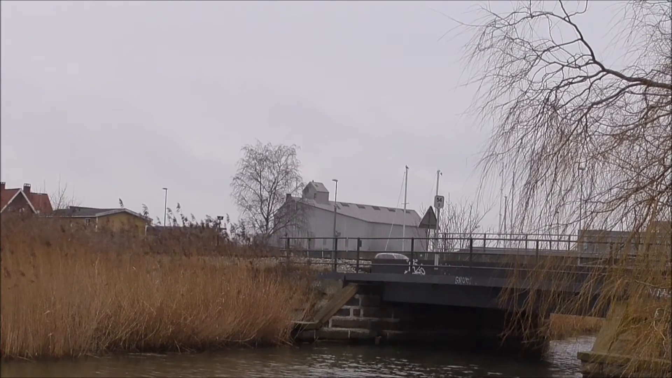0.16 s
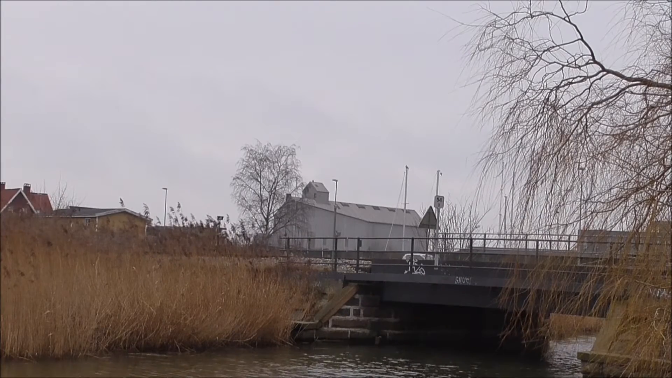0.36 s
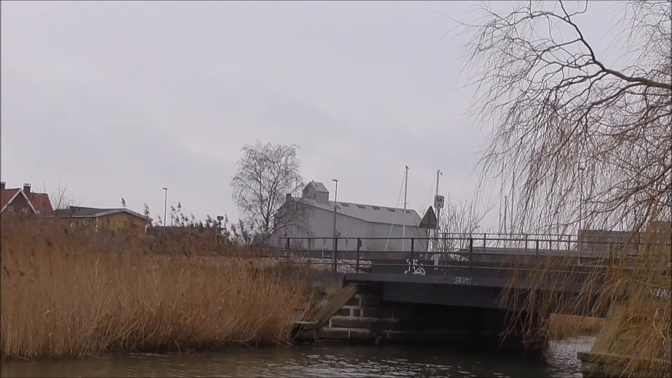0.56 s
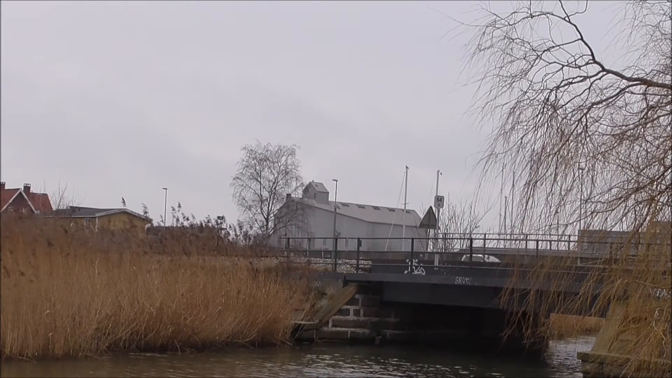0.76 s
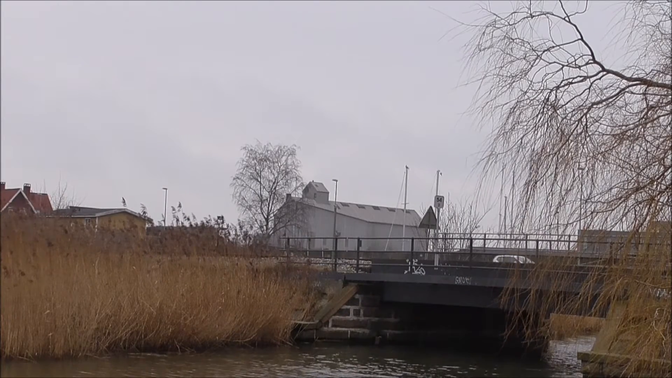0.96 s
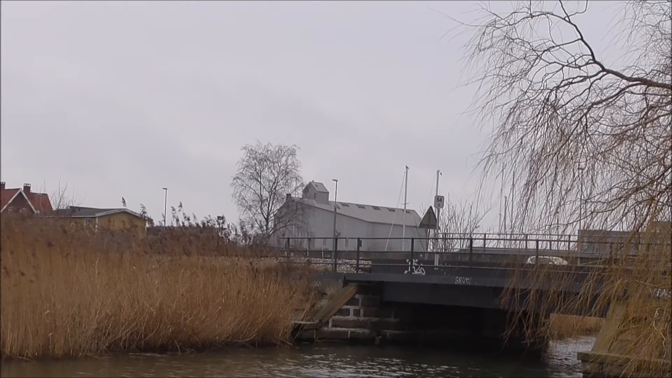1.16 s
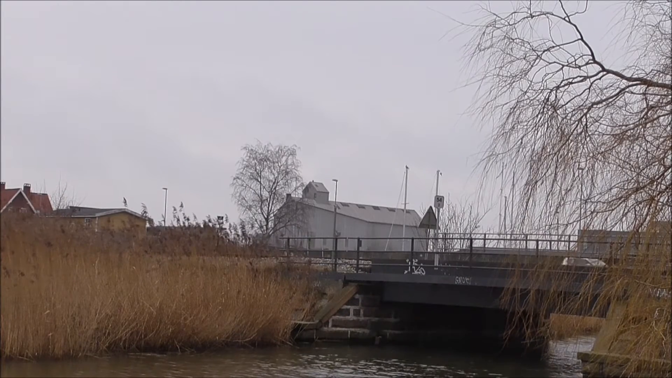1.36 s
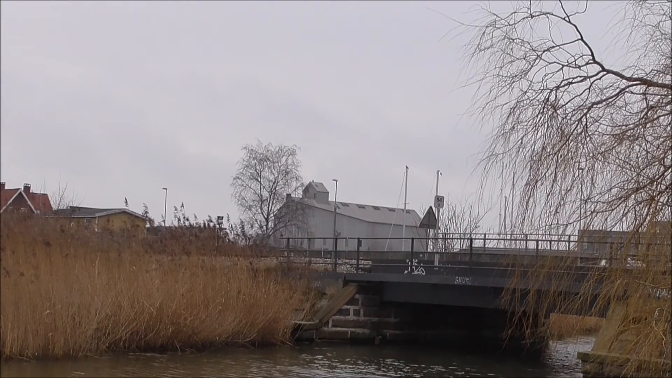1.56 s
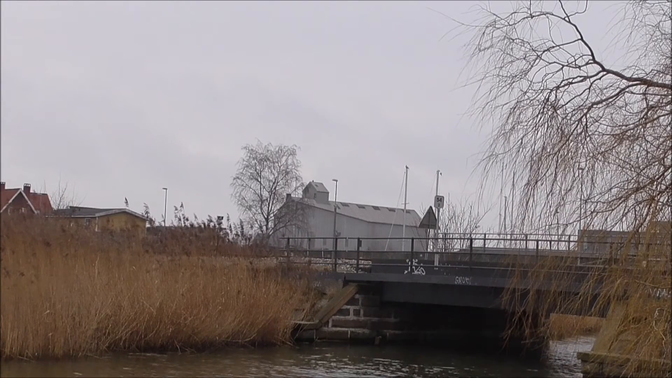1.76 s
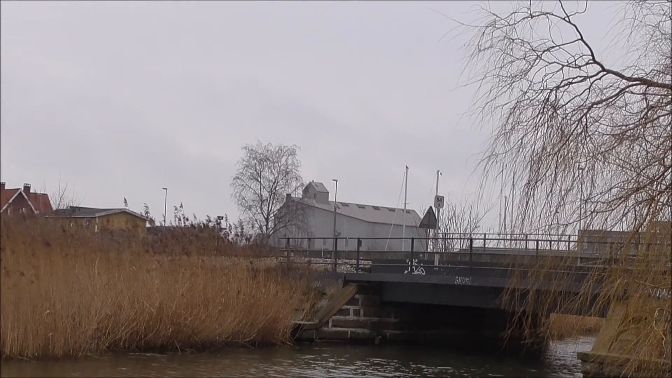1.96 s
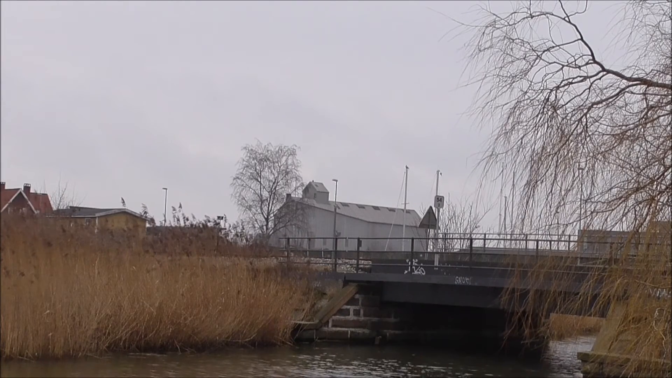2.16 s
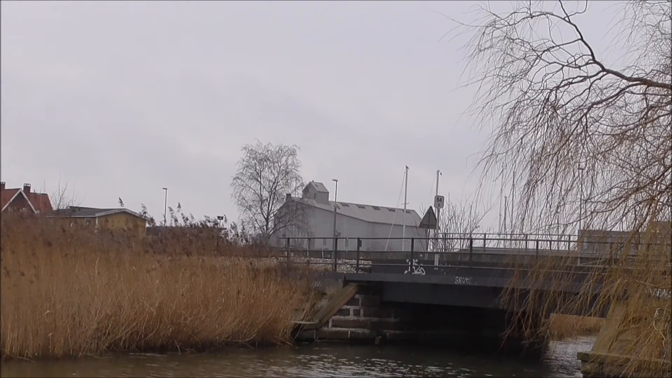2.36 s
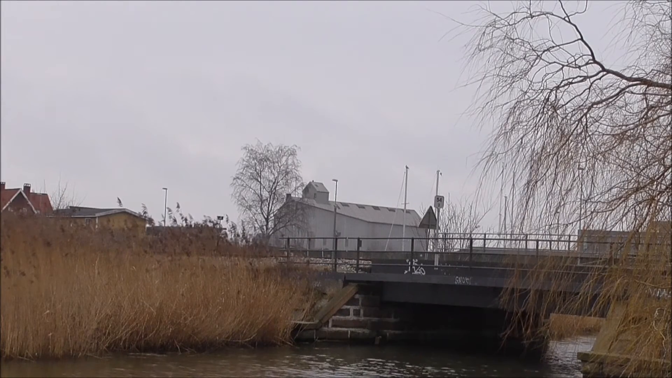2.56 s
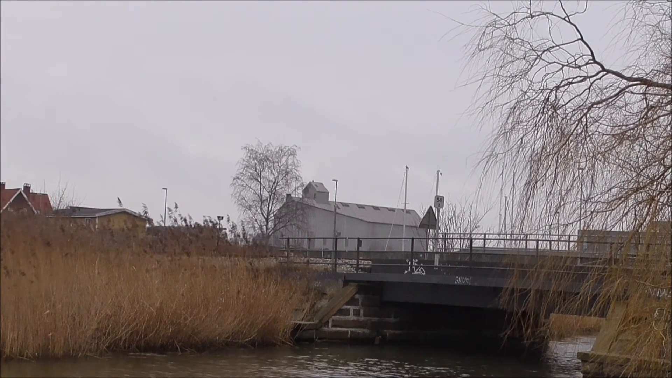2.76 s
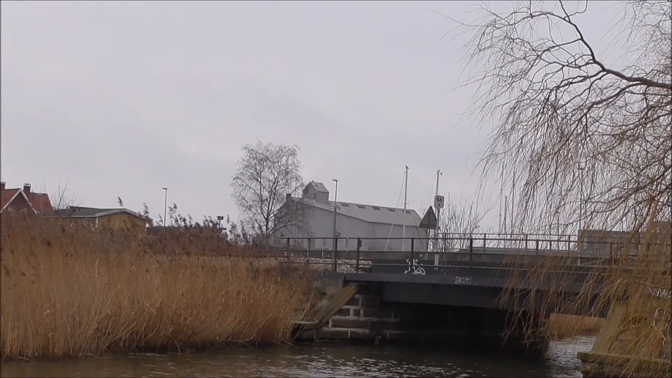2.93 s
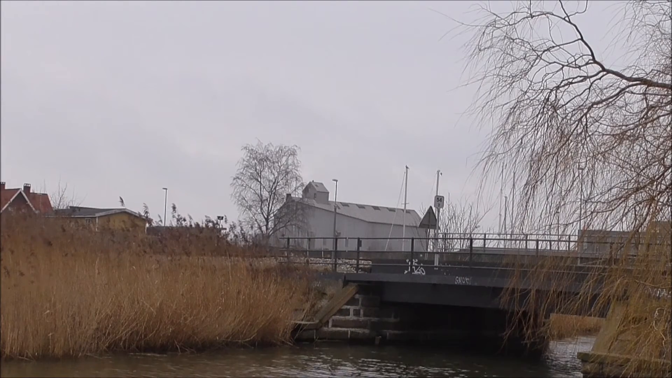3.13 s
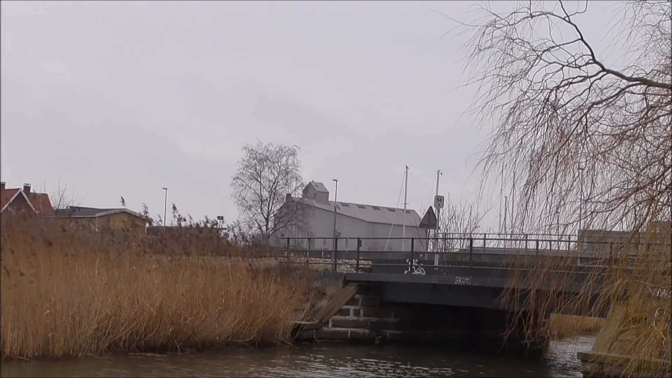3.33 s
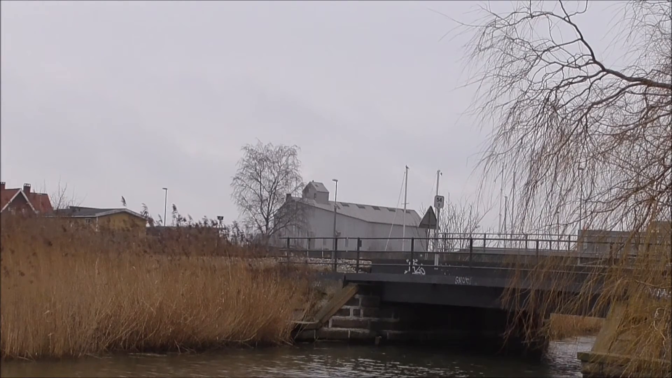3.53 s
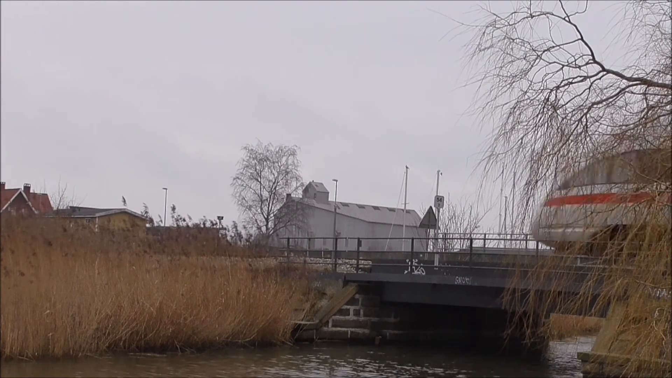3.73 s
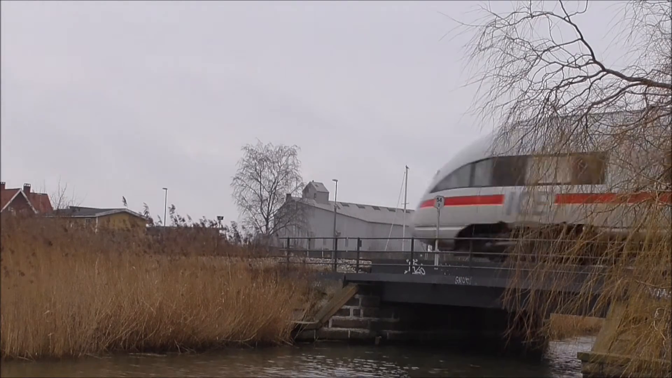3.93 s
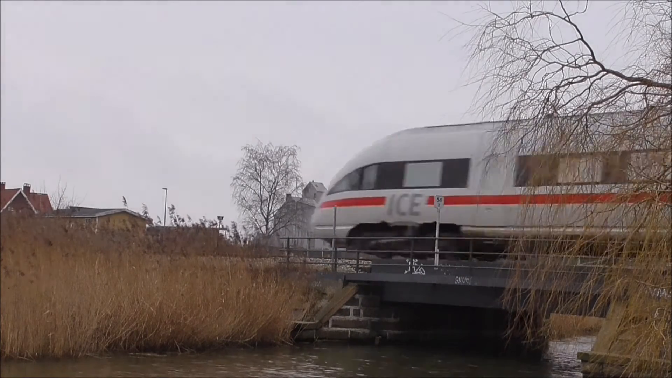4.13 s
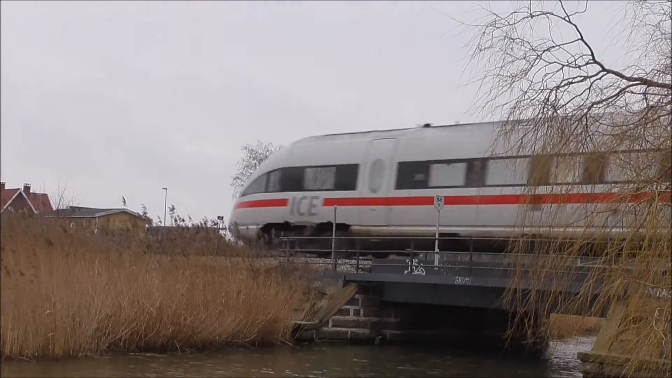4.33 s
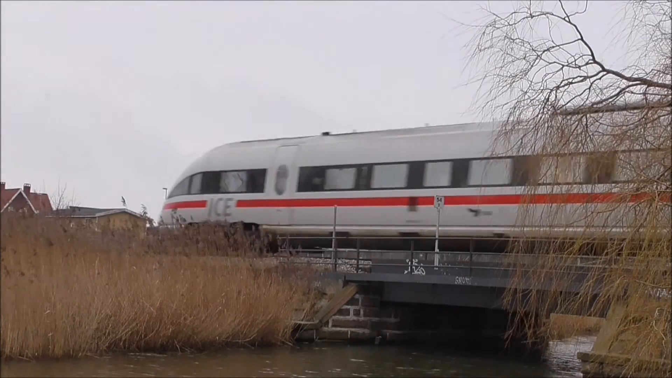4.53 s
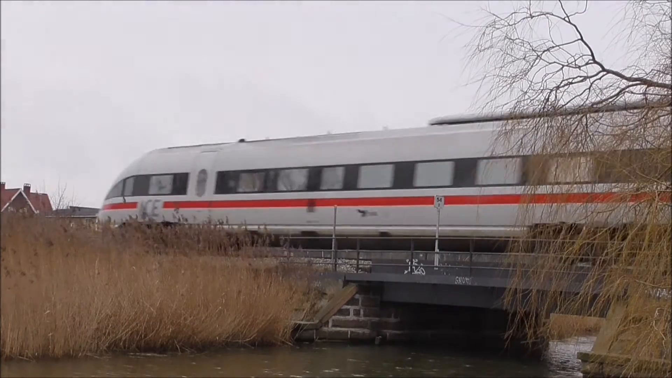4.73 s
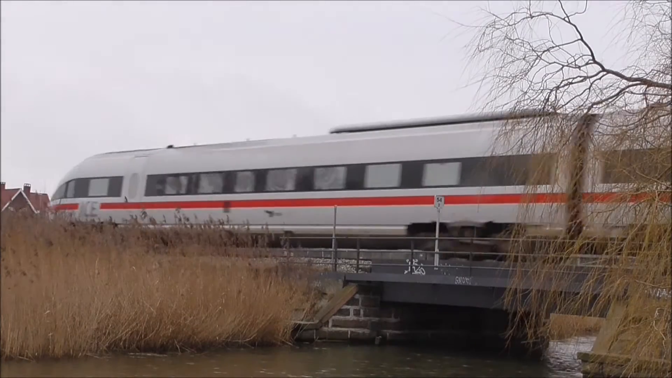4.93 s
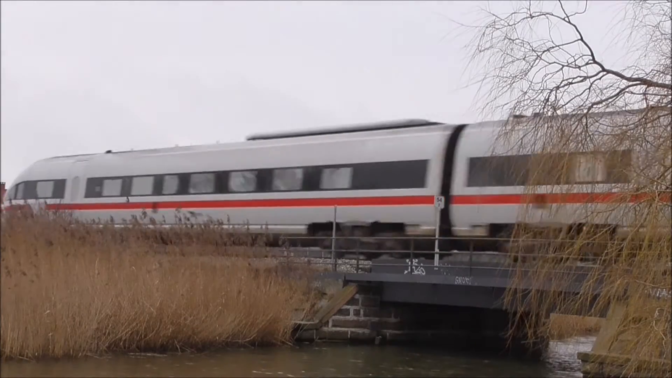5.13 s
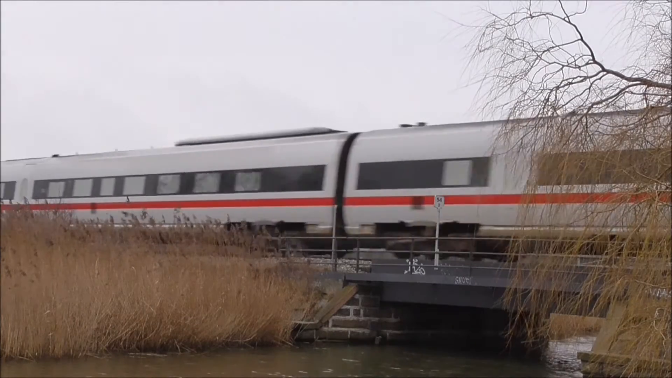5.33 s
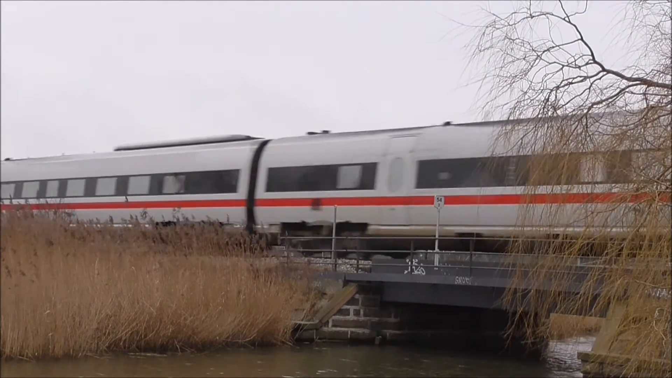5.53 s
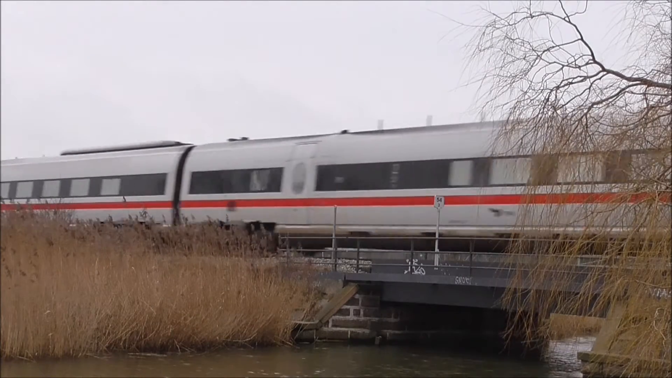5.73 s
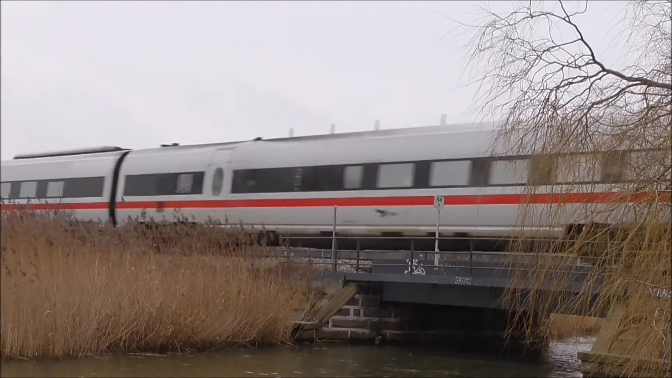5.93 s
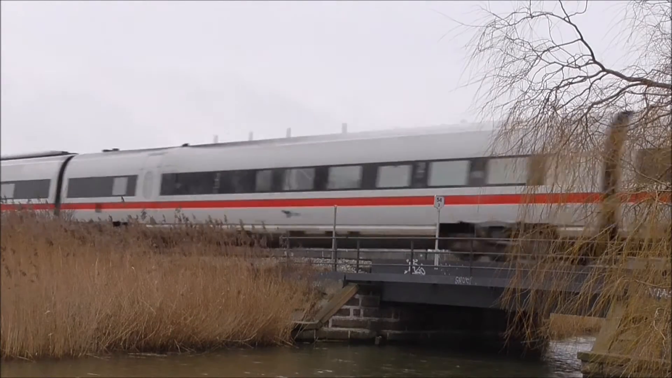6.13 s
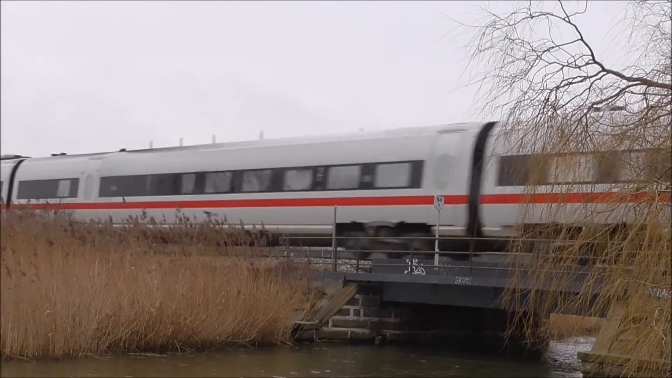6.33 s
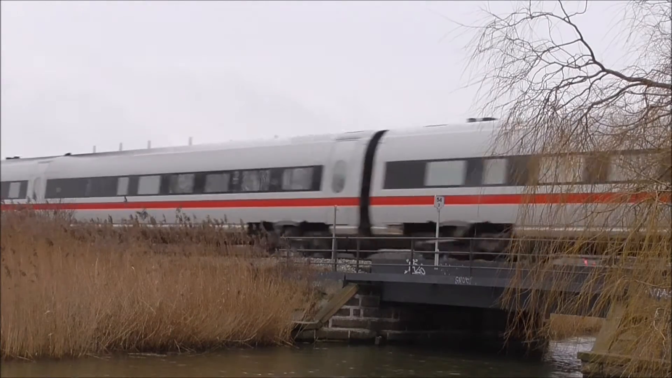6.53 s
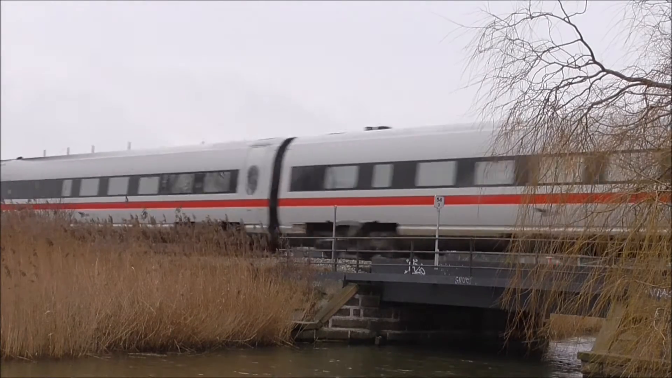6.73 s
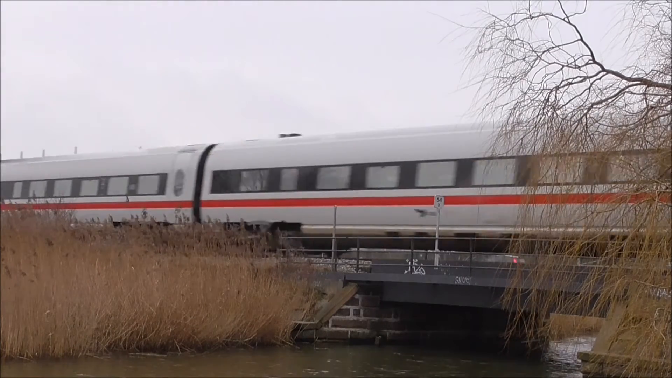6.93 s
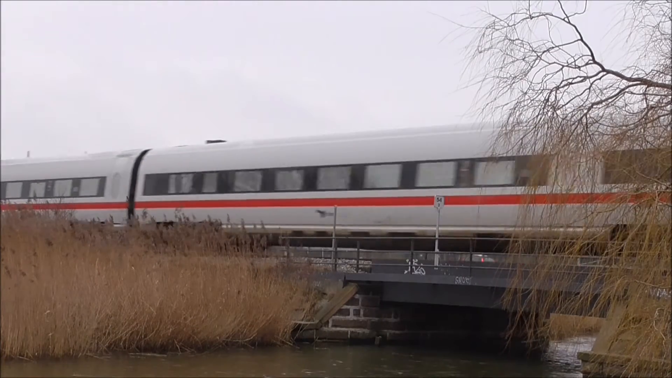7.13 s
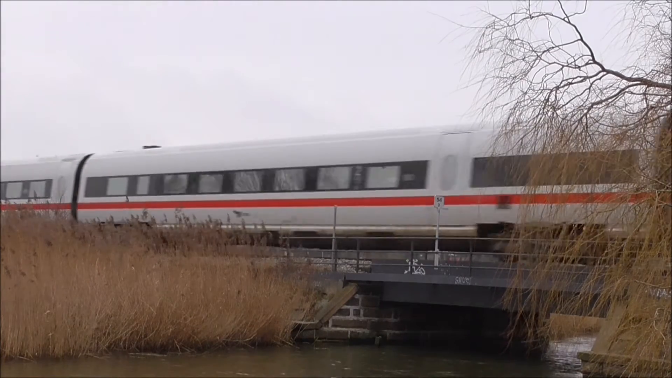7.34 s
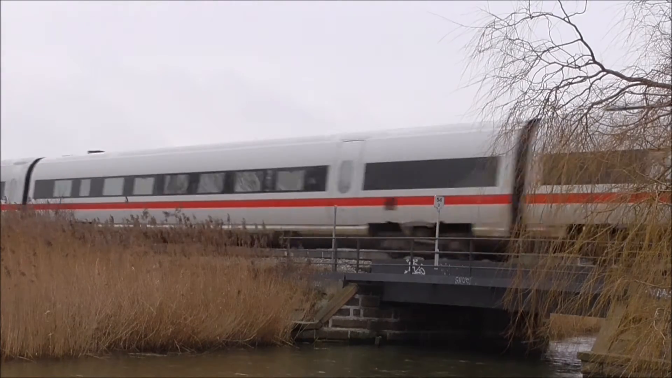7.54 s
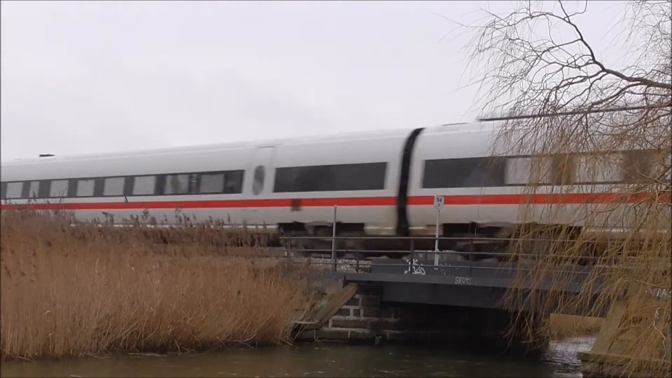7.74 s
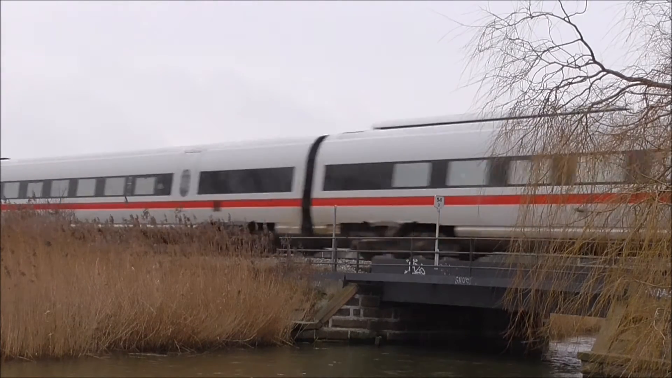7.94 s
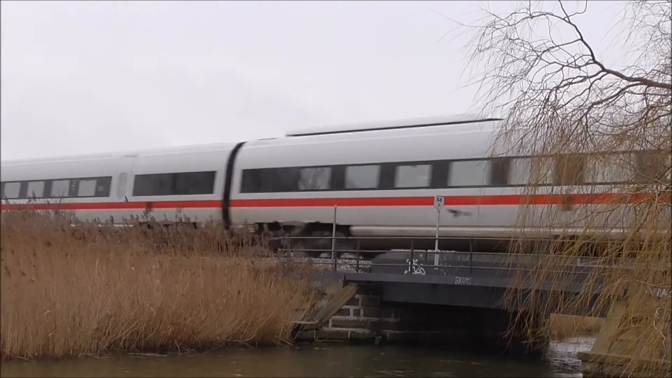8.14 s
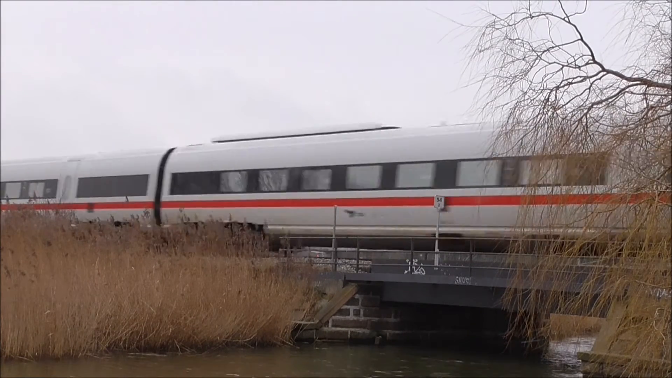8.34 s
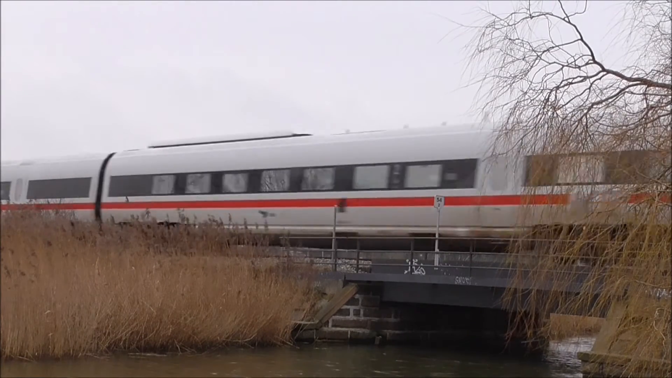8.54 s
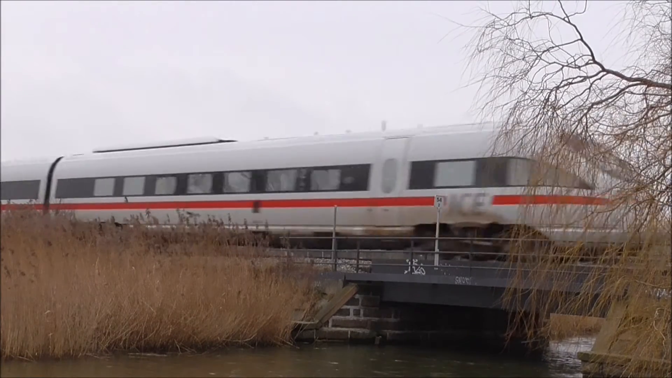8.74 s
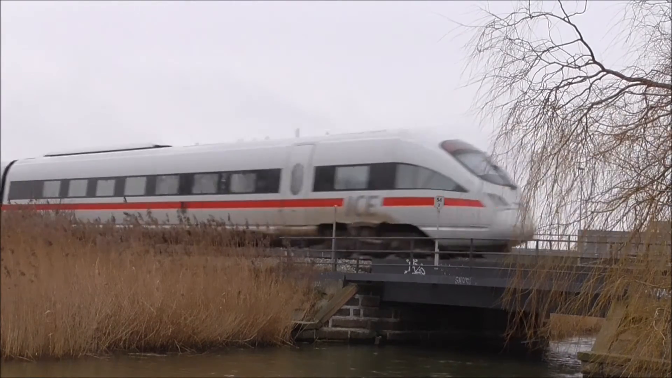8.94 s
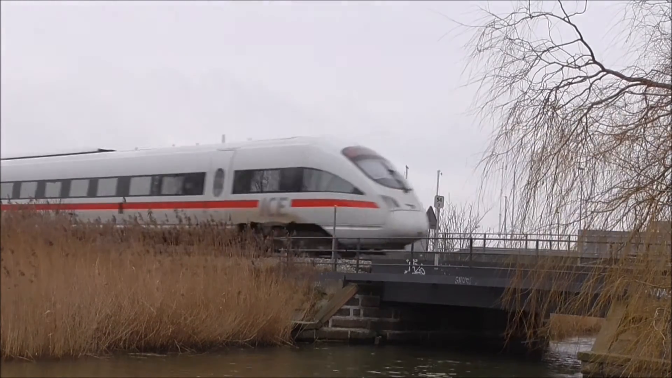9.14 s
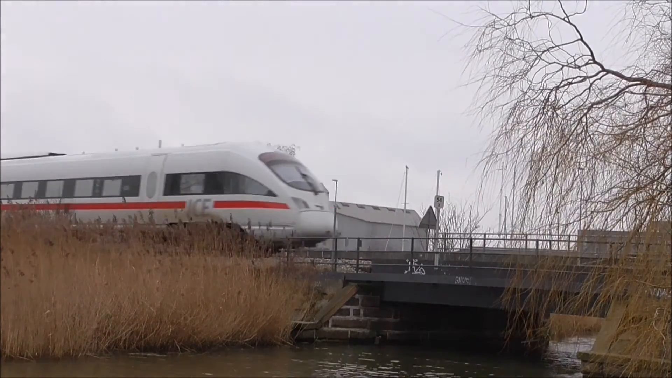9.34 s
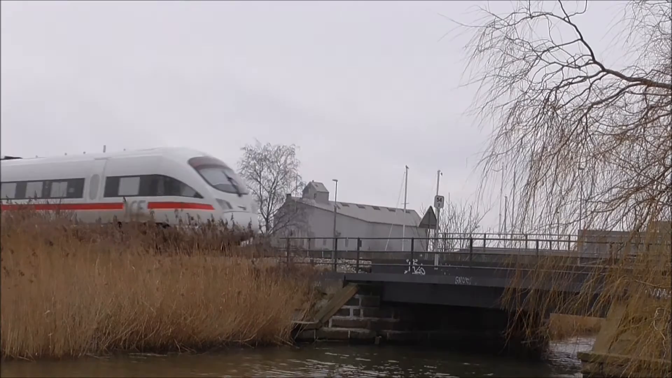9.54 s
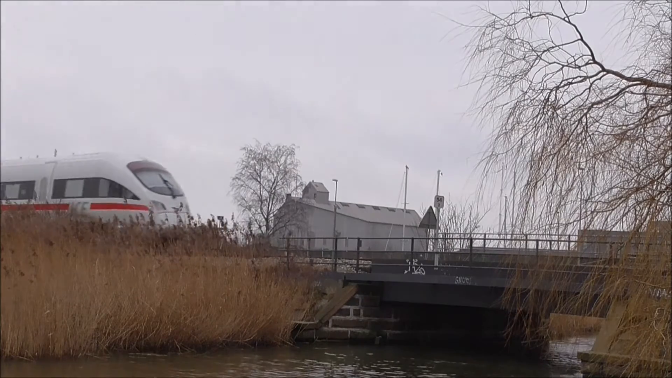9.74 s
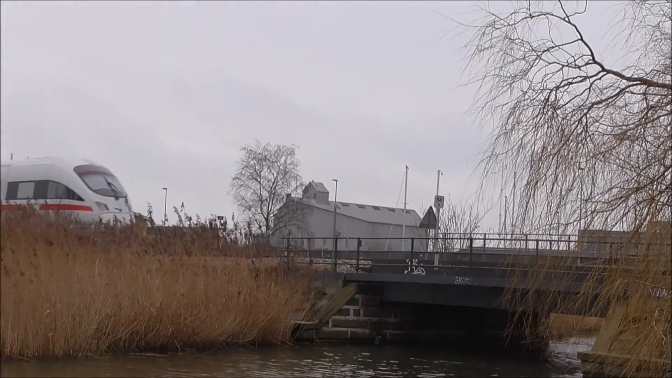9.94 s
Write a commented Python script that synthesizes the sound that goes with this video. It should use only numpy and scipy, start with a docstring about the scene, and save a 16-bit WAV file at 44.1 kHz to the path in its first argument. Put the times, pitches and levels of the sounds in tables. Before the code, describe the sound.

A fixed outdoor stereo microphone close to a steel railway bridge hears far tyre wash, then a growing roar and bright sizzle in the rails. The train crosses for about five seconds: deep deck boom surging coach by coach, nasal mid-pitched whine with short bursts, metallic wheel ring, airy rush and low clunks. The sound narrows and fades, leaving wheel singing and tiny dry ticks.

```python
"""Train crossing a steel bridge

A fast passenger train comes up and crosses a low steel bridge, heard from the river bank.
Shaped noise makes the hiss of the rails ahead of it, the boom of the deck and the ring of the wheels.
Gliding tones make the whine of a few wavy wheelsets, throbbing once a turn and sinking in pitch.
Decaying tones make the knocks; road noise, faint hiss, a hum and small ticks fill in the rest."""
import sys
import numpy as np
from scipy import signal
from scipy.fft import rfft, irfft
from scipy.io import wavfile
from scipy.ndimage import map_coordinates

SR = 44100
rng = np.random.default_rng(int(sys.argv[2]) if len(sys.argv) > 2 else 0)


def bounce(signal):
    """Save signal as a 16-bit WAV file at the path given by the first command-line argument."""
    frames = np.transpose(np.atleast_2d(signal))
    limited = np.clip(frames, -1, 1)
    pcm = np.round(limited * 32767).astype(np.int16)
    wavfile.write(sys.argv[1], SR, pcm)


N = 440559
TIME = np.arange(N) / SR   # seconds
FREQS = np.maximum(np.arange(N // 2 + 1) * SR / N, 1)   # Hz
LEFT_RIGHT = np.array([[1], [-1]])   # opposite signs for the two sides
# the head of the train draws level, and its tail starts to draw away (s)
HEAD_S, TAIL_S = 3.55, 8.6


def from_db(db):
    """Decibels to gain."""
    return 10 ** (np.asarray(db) / 20)


def rms_one(x):
    """Scale to unit power."""
    return x / np.sqrt(np.mean(np.abs(x) ** 2) + 1e-20)


def at_hz(points):
    """Read a table of pitches and values on a log-frequency axis."""
    hz, value = np.transpose(points)
    return np.interp(np.log(FREQS), np.log(hz), value)


def colour(spectrum, modes=()):
    """Gain of a spectrum with steep ends, lifted (or dipped) around its resonances."""
    db = at_hz(spectrum)
    for hz, width_hz, lift_db in modes:
        db = db + lift_db / (1 + (2 * (FREQS - hz) / width_hz) ** 2)
    low_end = np.minimum(FREQS / spectrum[0][0], 1)
    high_end = np.minimum(spectrum[-1][0] / FREQS, 1)
    return from_db(db) * (low_end * high_end) ** 6


def wander(width_hz, size=8192):
    """Slow complex random drift of unit power and given bandwidth, drawn on a coarse time grid."""
    hz = np.arange(size // 2 + 1) * SR / N
    smoothing = 1 + (2 * hz / width_hz) ** 4
    real, imag = irfft(rfft(rng.standard_normal((2, size))) / smoothing)
    return np.interp(np.arange(N) * size / N, np.arange(size), rms_one(real + 1j * imag))


# how alike the two microphones hear each pitch: pitch_hz, left_right_correlation (-1 to 1)
LIKENESS = [(30, .96), (90, .995), (500, .99), (800, .95), (1130, .68), (1500, .85), (2150, .96),
            (3200, .87), (4000, -.15), (4900, -.75), (5900, -.7), (7200, .15), (10000, .5), (15000, .5)]


def noise(spectrum, modes=()):
    """Stereo noise whose middle has unit power; its side follows the likeness of the microphones."""
    mid, side = rfft(rng.standard_normal((2, N))) * colour(spectrum, modes)
    alike = np.clip(at_hz(LIKENESS), -.95, .998)
    mid, side = irfft([mid, side * np.sqrt((1 - alike) / (1 + alike))], N)
    return (mid + side * LEFT_RIGHT) / np.std(mid)


def band(hz, width_hz, side_db):
    """A narrow band of noise on a gliding pitch, with a weaker part scattered by the banks."""
    carrier = np.exp(2j * np.pi * np.cumsum(hz) / SR)
    mid, side = (rms_one((carrier * wander(width_hz)).real) for _ in range(2))
    return mid + from_db(side_db) * side * LEFT_RIGHT


def flutter(depth_db, rate_hz):
    """Uneven gain from changing roughness under the wheels."""
    return from_db(depth_db * wander(rate_hz).real)


def swell(start, end, rise_db_per_s, fall_db_per_s):
    """Gain that climbs towards one at start, holds until end and dies away."""
    before = np.maximum(start - TIME, 0)
    after = np.maximum(TIME - end, 0)
    return from_db(-rise_db_per_s * before - fall_db_per_s * after)


def bump(s, half_length):
    """A smooth hump of height one."""
    return np.exp(-((TIME - s) / half_length) ** 2)


# every pitch falls by about this share on either side of its closest point, over about this long (s)
DOPPLER_SWING, DOPPLER_S = .119, 1.954


def doppler(closest):
    """Pitch ratio of something on the train: high while it nears, low once it has gone by."""
    since = TIME - closest
    return 1 / (1 + DOPPLER_SWING * since / np.hypot(since, DOPPLER_S))


# the noise surges once for each coach: middle_s, half_length_s, rail_lift_db, wheel_lift_db, hiss_lift_db
COACHES = [(3.782, 0.23, 3, 2.5, 3.5), (4.901, 0.21, 2, 3, 3.5), (6.094, 0.75, 5, 5, 3.5),
           (7.337, 0.18, 3, 2.5, 0), (8.101, .45, 1.5, 2.5, 0)]


def surges():
    """Gains of rails, wheels and hiss as one coach after another goes by."""
    return from_db(sum(np.outer(lifts_db, bump(s, half_length)) for s, half_length, *lifts_db in COACHES))


SLEEPERS_PER_S = 31.5


def sleepers(depth):
    """Gain that ripples as the wheels pass over the sleepers."""
    return 1 + depth * np.cos(2 * np.pi * SLEEPERS_PER_S * TIME)


# the microphones' own hiss: pitch_hz, relative_level_db (per Hz)
MIC_HISS = [(5000, -5.5), (10000, 4), (13000, 1), (16000, -2.5)]


def mic_hiss(level_db=-77.0):
    """The microphones add a faint, even hiss of high noise."""
    return from_db(level_db) * noise(MIC_HISS)


# rumble of distant traffic: pitch_hz, relative_level_db (per Hz)
TRAFFIC = [(30, -28), (48, -15.5), (68, -3), (100, 2.5), (135, -3), (300, -20)]
# tyres on a road behind the bridge: pitch_hz, relative_level_db (per Hz)
TYRES = [(600, -5), (900, 4), (1400, -5), (2100, -9.5), (3000, -22.5), (5000, -36)]


def traffic(level_db=-55, tyres_db=-49):
    """Far roads make a low steady rumble under everything, with a wash of tyres."""
    return from_db(level_db) * noise(TRAFFIC) + from_db(tyres_db) * noise(TYRES)


# thin sizzle of the rails: pitch_hz, relative_level_db (per Hz)
RAIL_SIZZLE = [(2500, -26.5), (3600, -12), (4500, -10.5), (5900, -22.5), (7000, -20.5), (7900, -8),
               (9200, -4), (11000, -3), (11900, -7), (13300, -15), (15500, -17.5)]
# the flare of the sizzle, brighter than the rest of it: pitch_hz, relative_level_db (per Hz)
SIZZLE_FLARE = [(2650, -21), (3600, -9), (4600, -9), (5950, -22), (6400, -18), (6910, -17), (7670, -11),
                (11100, 2), (11700, -0.5), (15500, -15)]
# the flare spurts before it breaks off: middle_s, half_length_s, lift_db
SPURTS = [(2.32, .03, 2), (2.591, .01, 2.5), (2.647, .013, 2), (2.738, .018, 4.5)]


def sizzle(level_db=-62.0, loudest_s=2.1, flare_from=2.33, flare_until=2.755, flare_db=-45.0,
           flare_growth_db_per_s=15):
    """Rails carry a thin sizzle far ahead of the wheels; a brighter flare spurts, then breaks off."""
    bed = from_db(level_db) * swell(loudest_s, loudest_s, rise_db_per_s=9.5, fall_db_per_s=2) * surges()[2]
    growth_db = flare_db + flare_growth_db_per_s * np.minimum(TIME - flare_until, 0)
    spurt_db = sum(db * bump(s, half_length) for s, half_length, db in SPURTS)
    flare = from_db(growth_db + spurt_db) * swell(flare_from, flare_until, rise_db_per_s=60, fall_db_per_s=225)
    flare = flare * flutter(depth_db=1.3, rate_hz=160)
    return bed * noise(RAIL_SIZZLE) + flare * noise(SIZZLE_FLARE)


def rail_ring(start=2.14, end=3.1, level_db=-55, pitch_hz=2620, sag_hz_per_s=190, width_hz=750):
    """The rails ring in a broad high band, sinking in pitch, just ahead of the first wheels."""
    level = from_db(level_db) * swell(start, end, rise_db_per_s=110, fall_db_per_s=6.5)
    return level * band(pitch_hz - sag_hz_per_s * (TIME - start), width_hz, side_db=-8.0)


# rush of air: pitch_hz, relative_level_db (per Hz)
AIR = [(3500, -19.5), (5000, -6.5), (5700, -0.5), (6500, -6), (7400, 1), (9000, 0), (9800, 0.5),
       (10800, -11), (12500, -24)]


def rush(level_db=-64.5):
    """Air rushes along the coaches while they are near."""
    level = from_db(level_db) * swell(HEAD_S, TAIL_S, rise_db_per_s=6.5, fall_db_per_s=9) * surges()[2]
    return level * sleepers(depth=.12) * noise(AIR) * flutter(depth_db=0.7, rate_hz=110)


# small dry ticks: start_s, relative_level_db
TICKS = [(7.3864, -45), (9.6081, -44), (9.6218, -50), (9.6324, -52), (9.685, -42), (9.737, -40),
         (9.7475, -51)]
# colour of a tick: pitch_hz, relative_level_db (per Hz)
TICK = [(4000, -29), (7000, -11), (9000, 0), (11500, -1), (16000, -21)]


def ticks(decay=0.0054, gain_db=-13.0):
    """Bright snaps of noise die away with a time constant of a few milliseconds."""
    hits = np.zeros(N)
    for s, level_db in TICKS:
        hits[int(s * SR)] = from_db(level_db + gain_db)
    fade_per_sample = np.exp(-1 / (decay * SR))
    return signal.lfilter([1], [1, -fade_per_sample], hits + 1e-18) * noise(TICK)


# clatter of the running gear: time_s, level_db, boom_db (added to the lowest modes)
KNOCKS = [(4.925, -16, -12), (5.18, -21, 8), (5.222, -12, -14), (5.418, -11, -4), (6.165, -14, -8),
          (6.467, -3, -14), (6.573, -11.5, -10), (6.649, -16, -8), (6.683, -17, 2), (7.638, -15, 2),
          (7.899, -17, -4), (8.066, -15, -8), (8.195, -16, -14)]
# ring of a knock: pitch_hz, relative_level_db, t60_s (time to fade by 60 dB)
KNOCK_MODES = [(159, 2.5, 0.2), (182, -6.5, .07), (250, -11, .06), (295, 0.5, 0.087), (476, -8.5, 0.016)]
BOOM_BELOW_HZ = 220


def knocks(rise=0.0049):
    """A jolt of a bogie sets the heavy deck ringing, softly at first; its boom depends on where it lands."""
    out = np.zeros(N)
    for s, level_db, boom_db in KNOCKS:
        start = int((s - rise) * SR)
        age = TIME[:min(SR // 2, N - start)]
        ring = 0
        for hz, db, t60 in KNOCK_MODES:
            fading_db = db + boom_db * (hz < BOOM_BELOW_HZ) - 60 * age / t60
            ring = ring + from_db(fading_db) * np.sin(2 * np.pi * hz * age)
        soft_start = 1 - np.exp(-(age / rise) ** 2)
        out[start:start + len(age)] += from_db(level_db) * ring * soft_start
    return out


# the drive hum swells as driven axles cross the deck: loudest_s, pitch_hz, level_db
HUM_SWELLS = [(3.5, 170.3, -33.5), (4.55, 146, -32), (5.17, 161, -27.5), (5.85, 140.3, -35),
              (6.68, 161.2, -20.5), (7.72, 165.2, -31.5), (9.05, 168, -34.5), (9.55, 142.5, -42)]
HUM_THROB = .5   # depth, 0-1


def hum(start_hz=179, sag_hz_per_s=2.8, steady_db=-44, rough=0.43, rough_hz=22, octave_db=-13,
        octave_width_hz=30, throb_hz=15.5, throb_at=6.69):
    """The drive hums a firm low tone with a blurred octave, throbbing about twice per wheel turn."""
    steady = from_db(steady_db) * swell(HEAD_S, TAIL_S, rise_db_per_s=1.5, fall_db_per_s=6)
    voices = [(start_hz - sag_hz_per_s * TIME, steady)]
    for s, hz, db in HUM_SWELLS:
        voices.append((hz, from_db(db) * swell(s, s, rise_db_per_s=130, fall_db_per_s=29.0)))
    throb = 1 + HUM_THROB * np.cos(2 * np.pi * throb_hz * (TIME - throb_at))
    body = rms_one(throb * (1 + rough * wander(rough_hz)))
    octave = from_db(octave_db) * wander(octave_width_hz)
    out = 0
    for hz, level in voices:
        cycles = np.cumsum(hz * np.ones(N)) / SR + rng.random()
        carrier = np.exp(2j * np.pi * cycles)
        # the carrier times itself sounds an octave higher
        out = out + level * (carrier * (body + octave * carrier)).real
    return np.sqrt(2) * out


# spectrum of the deck: pitch_hz, relative_level_db (per Hz)
DECK = [(22, -40), (45, -28.5), (65, -14), (100, -9), (140, -1.5), (200, -1), (240, -2), (370, -3.5),
        (450, -1.5), (510, -5.5), (600, -1), (700, -5), (900, -24.5), (1300, -50)]
# resonances of the deck: pitch_hz, width_hz, lift_db
DECK_MODES = [(167, 44, 3.9), (280, 60, 3.8)]
# girders ringing under the bogies: pitch_hz, width_hz, relative_level_db
GIRDER_MODES = [(167, 26, -3.5), (283.8, 22, .5), (317.8, 26, -3), (450.7, 46, -2.5), (605.6, 80, -1.5)]
# bogies on the bridge, alone at the ends and in pairs between coaches:
# roll_on_s, roll_off_s, deck_boom_db, girder_ring_db
BOGIES = [(3.092, 3.75, -27, -45), (4.02, 4.478, -32, -29), (4.901, 5.556, -24, -24),
          (6.145, 6.72, -20.5, -22), (7.68, 8.217, -23.5, -24.5), (8.877, 9.22, -27, -27.5)]
BOOM_RISE_DB_PER_S, BOOM_FALL_DB_PER_S = 61.5, 51.5


def deck_boom(between_db=-26.5, fade_from=8.12, fade_db_per_s=3, surge_share=0.93):
    """The deck rumbles under the whole train; it booms and its girders ring while bogies stand on it."""
    bed_db = between_db - fade_db_per_s * np.maximum(TIME - fade_from, 0)
    bed = from_db(bed_db) * surges()[0] ** surge_share
    loads = np.array([swell(on, off, BOOM_RISE_DB_PER_S, BOOM_FALL_DB_PER_S) for on, off, *_ in BOGIES])
    # the powers of all the bogies add up
    boom, ring = np.sqrt(from_db(np.transpose(BOGIES)[2:]) ** 2 @ loads ** 2)
    girders = rms_one(sum(from_db(db) * band(np.full(N, hz), width_hz, side_db=-29)
                          for hz, width_hz, db in GIRDER_MODES))
    return np.hypot(bed, boom) * noise(DECK, DECK_MODES) + ring * girders


# ring of the wheels: pitch_hz, relative_level_db (per Hz)
WHEEL = [(1400, -26.5), (1700, -12), (1850, -5.5), (2050, 2), (2190, 0), (2320, -6.5), (2500, -15),
         (2780, -7.5), (3400, -11.5), (4200, -22.5), (4600, -28), (5000, -35.5), (6500, -43)]


def wheel_ring(level_db=-38.5, sag_per_s=.005, treble_hz=3400, nearing_db=-3.0, leaving_db=2.0):
    """Rolling keeps the wheel modes ringing; pitch sinks a little and treble grows as the train goes by."""
    speed = 1 - sag_per_s * (TIME - TAIL_S)
    # reading the noise more and more slowly lowers its pitch
    position = np.cumsum(speed)
    ring = np.array([map_coordinates(side, [position], order=3, mode="wrap") for side in noise(WHEEL)])
    treble = ring - irfft(rfft(ring) / (1 + (FREQS / treble_hz) ** 12), N)
    treble_db = np.interp(TIME, [HEAD_S, TIME[-1]], [nearing_db, leaving_db])
    ring = ring + treble * (from_db(treble_db) - 1)
    level = from_db(level_db) * swell(HEAD_S, TAIL_S, rise_db_per_s=3.5, fall_db_per_s=4.5)
    return level * ring * flutter(depth_db=0.9, rate_hz=23)


# roar of the train from afar: pitch_hz, relative_level_db (per Hz)
FAR_ROAR = [(25, -33), (45, -24), (70, -13.5), (110, -11), (250, -4), (340, -9), (520, -10), (700, -6.5),
            (1000, -11.5), (1350, -17), (1800, -28.5), (2600, -33.5), (4000, -43), (5200, -61)]
# resonances of the far roar: pitch_hz, width_hz, lift_db
FAR_MODES = [(181, 76, 6.5), (410, 56, 9), (456, 40, 4), (530, 70, -1.5), (1006, 72, 4.5), (2160, 250, 7.5),
             (2670, 530, -5.5)]
# roar of the rails: pitch_hz, relative_level_db (per Hz)
RAIL = [(400, -27), (650, -4), (850, 2), (1000, -4), (1150, -9.5), (1400, -11), (1750, -17), (2100, -26.5),
        (2800, -50)]


def rolling(near_from=2.26, near_full=3.64, far_db=-22.0, rail_db=-27.5, far_left_db=0.6):
    """The far roar gives way to the boom of the deck, the roar of the rails and the ring of the wheels."""
    near = np.clip((TIME - near_from) / (near_full - near_from), 0, 1)
    rail_surge, wheel_surge, _ = surges()
    far = from_db(far_db) * swell(HEAD_S, TAIL_S, rise_db_per_s=6.0, fall_db_per_s=0)
    far = far * noise(FAR_ROAR, FAR_MODES)
    far = far * from_db(far_left_db * LEFT_RIGHT)   # left raised, right lowered
    rail = from_db(rail_db) * rail_surge * swell(HEAD_S, TAIL_S, rise_db_per_s=1.0, fall_db_per_s=5.0)
    rail = rail * sleepers(depth=.12) * noise(RAIL) * flutter(depth_db=1.07, rate_hz=40)
    wheels = wheel_surge * wheel_ring()
    return np.sqrt(1 - near) * far + near * deck_boom() + np.sqrt(near) * (rail + wheels)


# single wheels singing as they go by, and last the lingering octave of the last wavy wheelset: closest_s,
# pitch_hz, loud_from_s, loud_until_s, level_db
SINGING = [(3.6, 2200, 3.6, 3.4, -46), (4.0, 2290, 3.75, 4.2, -48.5), (6.3, 2235, 6.25, 6.6, -44.5),
           (6.72, 2290, 6.68, 7.5, -44.5), (6.676, 2200, 6.85, 7.3, -43.5), (6.448, 2325, 7.9, 8.85, -42),
           (7.0, 1450, 9.4, 9.6, -41.5)]


def singing(row, width_hz=32, side_db=-18):
    """One lightly damped wheel mode, or a whine's octave, stands out of the ring, coming and going."""
    closest, pitch_hz, start, end, level_db = row
    level = from_db(level_db) * swell(start, end, rise_db_per_s=62, fall_db_per_s=30.5)
    return level * flutter(depth_db=2.5, rate_hz=11) * band(pitch_hz * doppler(closest), width_hz, side_db)


# middle pitch of the drone of all the other wheelsets: time_s, pitch_hz
DRONE_PITCH = [(0, 850), (2.5, 826.8), (3.8, 782.7), (4.6, 732.4), (6.1, 747.8), (7.2, 723.4), (8.4, 713),
               (8.9, 689.4)]


def drone_pitch():
    """The pitch of the drone (Hz) slides between the points of its table."""
    s, hz = np.transpose(DRONE_PITCH)
    return np.interp(TIME, s, hz)


def far_whine(level_db=-50.5, loudest_s=2.2, loudest_db=-45, width_hz=38, side_db=-12):
    """While still far off, the wheels share one Doppler shift and merge into a faint, steady tone."""
    level = from_db(np.interp(TIME, [0, loudest_s], [level_db, loudest_db]))
    level = level * swell(0, loudest_s, rise_db_per_s=0, fall_db_per_s=13)
    return level * band(drone_pitch(), width_hz, side_db)


def drone(level_db=-24, loud_from=4.14, loud_until=7.8, last_bogie_s=8.92, last_bogie_db=-22.5,
          last_bogie_hz=660, last_bogie_width_hz=190, width_hz=150, side_db=-16):
    """Many wheels at different Doppler shifts blur into one band; the last bogie roars lower and broader."""
    level = from_db(level_db) * swell(loud_from, loud_until, rise_db_per_s=7.0, fall_db_per_s=7.5)
    last = from_db(last_bogie_db) * bump(last_bogie_s, half_length=0.28)
    last_roar = last * band(np.full(N, last_bogie_hz), last_bogie_width_hz, side_db)
    return level * band(drone_pitch(), width_hz, side_db) + last_roar


# the wavy wheelsets: closest_s, pitch_hz, loud_from_s, loud_until_s, level_db, rise_db_per_s,
# fall_db_per_s, deepest_throb_s, throb_depth (0-1), octave_db, octave_until_s
WHINES = [(4.575, 738.8, 3.875, 5.05, -18, 23, 19, 4.168, .75, -44.5, 4.9),
          (4.0, 741, 3.87, 4.7, -26, 44.5, 8, 4.168, 0.5, -56, 4.7),
          (7.0, 728, 6.26, 6.48, -26, 7, 20, 6.3, .3, -56, 6.5),
          (6.932, 718.5, 6.75, 7.72, -22.3, 20, 7.5, 8.1, 0.25, -46, 8.9)]
# short bursts, one list for each wavy wheelset (some empty): middle_s, half_length_s, level_db
FLARES = [
    [(2.935, .03, -26), (3.295, .014, -22), (3.385, .065, -19), (3.48, 0.027, -27), (3.822, .012, -16.5),
     (3.92, 0.014, -19), (4.04, 0.025, -22), (4.168, 0.01, -12.5), (4.315, 0.021, -18.5),
     (4.533, 0.022, -18), (4.675, .014, -19.5), (4.75, 0.006, -18), (4.803, 0.01, -17),
     (4.865, 0.011, -23.5), (5.002, 0.011, -18), (5.152, 0.01, -19)],
    [],
    [],
    [(6.662, 0.011, -22), (6.775, 0.026, -24), (6.94, 0.0099, -16), (7.03, .03, -24), (7.305, 0.028, -22),
     (7.42, 0.028, -17.5), (7.537, .009, -19), (7.572, 0.032, -18), (7.945, 0.028, -23)],
]
WAVES_PER_TURN = 91
LEAST_THROB, THROB_S = .17, .45   # depth 0-1; half length of the deepest throb, s
WHINE_ROUGH = .32   # share of random roughness


def whine(row, flares, rough_hz=75, waver_hz=3.47, side_db=-22, octave_width_hz=30):
    """Waves on the tread drum the rail; their depth varies once round the wheel."""
    closest, pitch_hz, start, end, level_db, rise, fall, throb_at, deepest, octave_db, octave_end = row
    hz = pitch_hz * doppler(closest)
    level = from_db(level_db) * swell(start, end, rise, fall)
    bursts = sum(from_db(db) * bump(s, half_length) for s, half_length, db in flares)
    depth = LEAST_THROB + (deepest - LEAST_THROB) * bump(throb_at, THROB_S)
    cycles = np.cumsum(hz) / SR
    # wheel turns counted from the moment of the deepest throb
    turn = (cycles - np.interp(throb_at, TIME, cycles)) / WAVES_PER_TURN
    throb = (1 + depth * np.cos(2 * np.pi * turn)) / np.sqrt(1 + depth ** 2 / 2)
    waver = np.cumsum(waver_hz * wander(17.7).real) / SR
    carrier = np.exp(2j * np.pi * (cycles + waver))
    tone = rms_one((carrier * (1 + WHINE_ROUGH * wander(rough_hz))).real)
    scatter = from_db(side_db) * rms_one((carrier * wander(rough_hz)).real) * LEFT_RIGHT
    octave_level = from_db(octave_db) * swell(start, octave_end, rise, fall)
    octave = octave_level * band(2 * hz, octave_width_hz, side_db=-11.0)
    return (level * throb + bursts) * (tone + scatter) + octave


def spread(x, nearing_db=3.0, leaving_db=-5.5, narrows_from=4.0, narrows_until=9.0, below_hz=2600):
    """The roar sounds wide while the train comes in from the side, and narrows as it draws away."""
    mid, side = (x[0] + x[1]) / 2, (x[0] - x[1]) / 2
    low = irfft(rfft(side) / (1 + (FREQS / below_hz) ** 10), N)
    width_db = np.interp(TIME, [narrows_from, narrows_until], [nearing_db, leaving_db])
    side = side + low * (from_db(width_db) - 1)
    return np.array([mid + side, mid - side])


def scene():
    """The passing train over the quiet sounds of the place."""
    background = mic_hiss() + traffic()
    ahead = sizzle() + rail_ring()
    songs = sum(singing(row) for row in SINGING)
    whines = sum(whine(row, flares) for row, flares in zip(WHINES, FLARES))
    roar = spread(hum() + rolling() + songs + far_whine() + drone() + whines)
    return background + ahead + rush() + ticks() + knocks() + roar


# the two microphones differ in colour: pitch_hz, left_minus_right_db
BALANCE = [(60, -1.8), (700, -1.5), (1300, -3), (2100, -.3), (3300, 2), (4200, 2), (5500, -3), (8000, -4),
           (13000, -5.5)]
CUTOFF_HZ = 15750


def record(dry):
    """The two microphones differ in colour; the top is cut."""
    tilt = from_db(at_hz(BALANCE) * LEFT_RIGHT / 2)   # half the difference on each side
    low_pass = 1 / np.sqrt(1 + (FREQS / CUTOFF_HZ) ** 400)
    return irfft(rfft(dry) * tilt * low_pass, N)


dry = scene()
out = record(dry)
bounce(out)
```